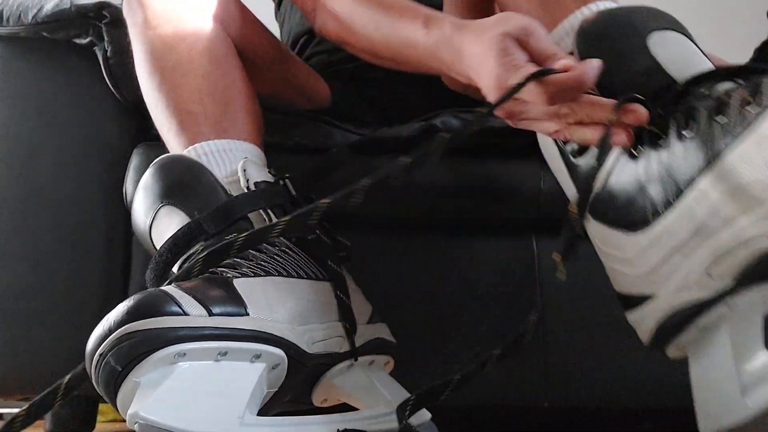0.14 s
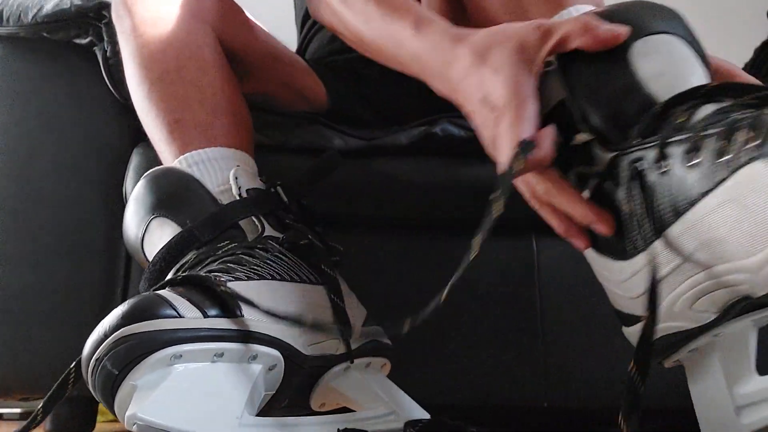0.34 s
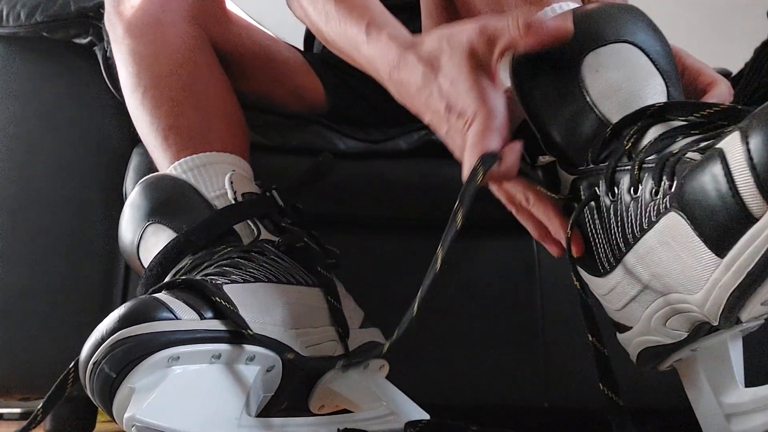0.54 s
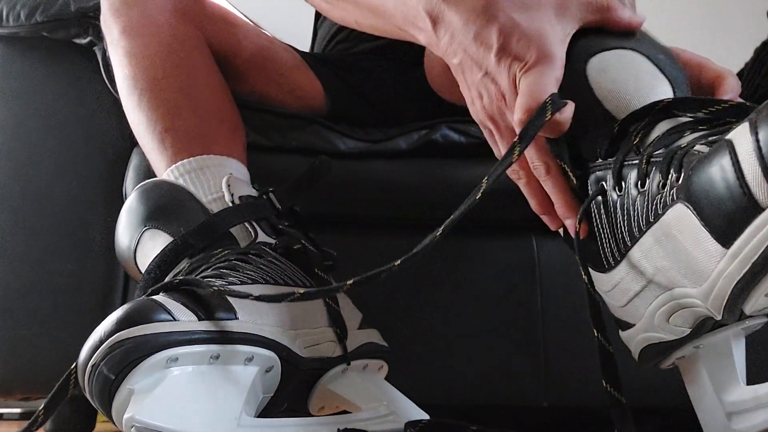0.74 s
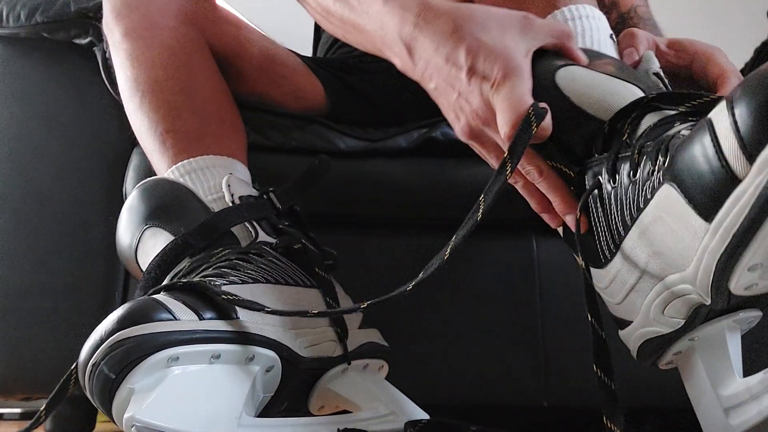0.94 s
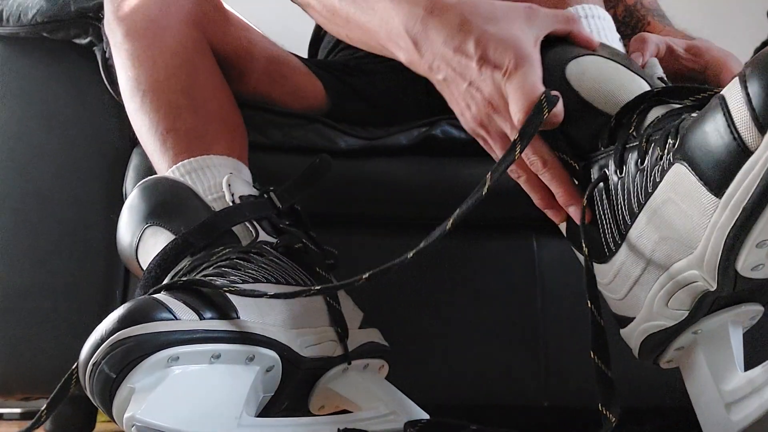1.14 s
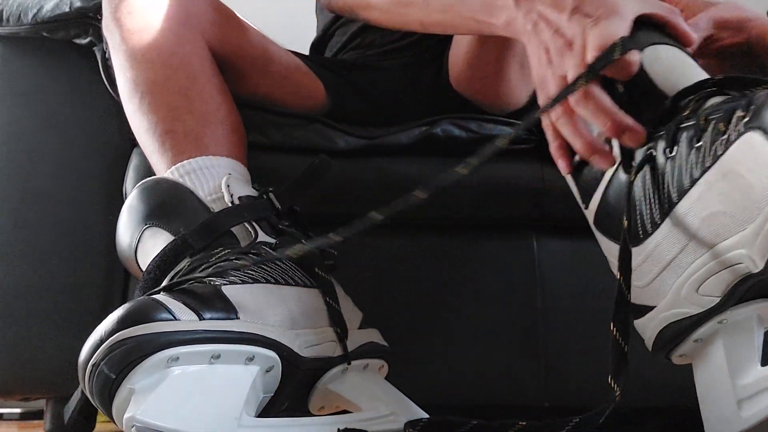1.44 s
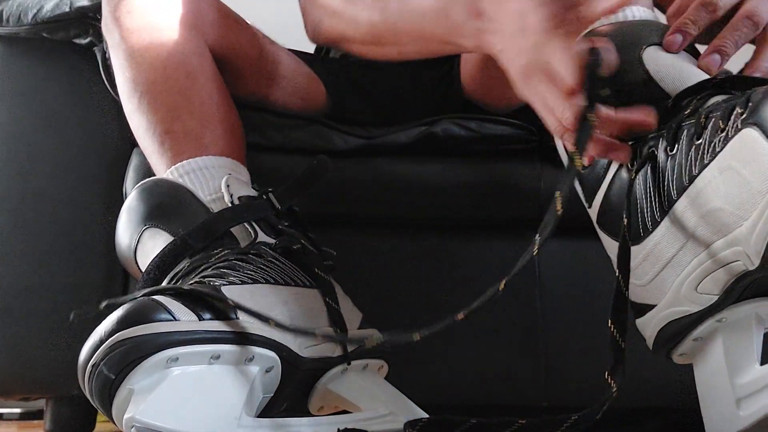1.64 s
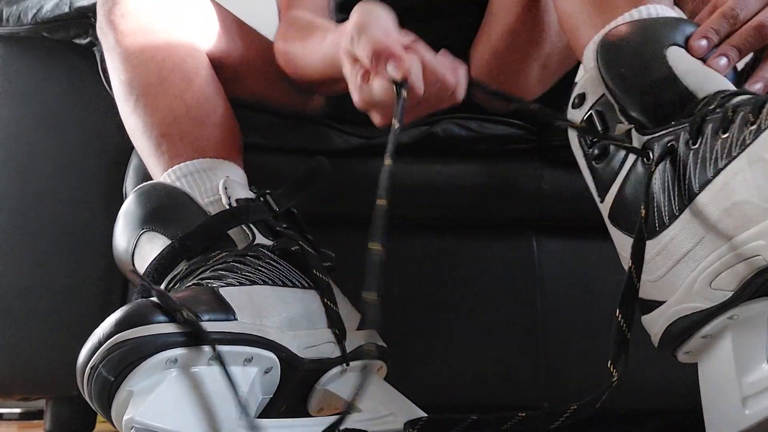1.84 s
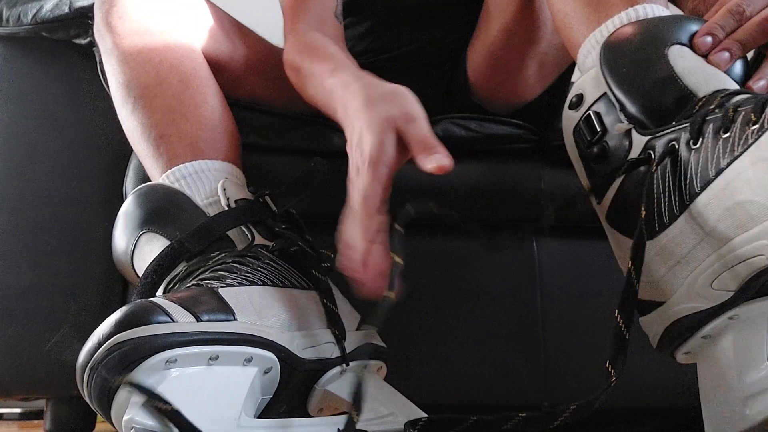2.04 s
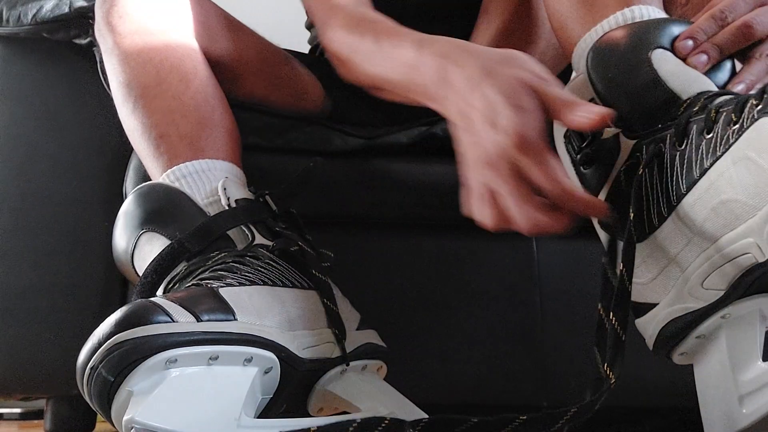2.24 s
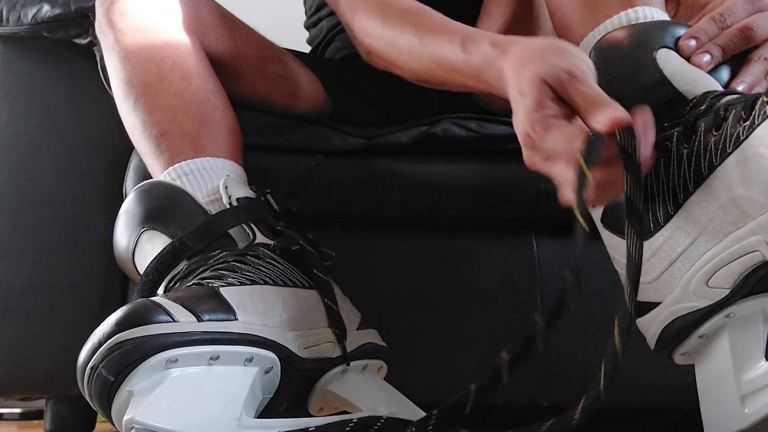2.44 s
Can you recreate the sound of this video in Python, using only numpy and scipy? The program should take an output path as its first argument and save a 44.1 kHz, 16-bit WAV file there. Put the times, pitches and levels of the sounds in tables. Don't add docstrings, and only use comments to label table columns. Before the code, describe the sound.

Close up in a quiet small room, hands lace a skate boot; it thuds and rattles early, lace zips briefly, snaps hard over eyelets around the middle, then slides, zips longer and ends with taps.

```python
import sys
import numpy as np
from scipy import signal
from scipy.fft import rfft, irfft
from scipy.io import wavfile

SR = 44100
rng = np.random.default_rng(int(sys.argv[2]) if len(sys.argv) > 2 else 0)


def generate_wav(sig):
    pcm = np.round(np.clip(np.atleast_2d(sig).T, -1, 1) * 32767).astype(np.int16)
    wavfile.write(sys.argv[1], SR, pcm)


def gain_from_db(level_db):
    decades = np.asarray(level_db, float) / 20
    return 10 ** decades


N = 114660

# frequency [Hz], density [dB per Hz].
ROOM_TONE = [(30, 5), (120, 1), (450, -10), (1000, -14.5), (2000, -29), (8000, -34), (16000, -33)]
# frequency [Hz], left over right [dB].
PORT_COLOUR = [(60, 0.5), (130, 1), (300, 0.3), (1300, -0.5), (2500, 9.5), (5500, 14), (9000, -5),
               (13000, 3)]
# frequency [Hz], left-right likeness [0-1].
PORT_LIKENESS = [(100, 0.58), (500, 0.25), (1500, 0.1), (4000, 0.032), (12000, 0.052)]
# start [s], rise [s], hold [s], level [dB].
SQUEAKS = [
    (2.08, 0.06, 0.1, -77),
]
SQUEAK_BANDS = (1350, 3200)
# frequency [Hz], level [dB], 60 dB decay time [s].
FLOOR_MODES = [(132.7, -10.5, 0.2), (115, -5.5, 0.026), (120, -14, 0.093), (187, -11.5, 0.053)]
# time [s], level [dB].
ROCKS = [
    (.192, -48.5),
    (0.346, -46),
    (0.37, -43),
    (0.397, -44.5),
    (0.422, -57),
    (0.594, -45),
    (0.741, -56),
    (.928, -44),
    (1.602, -47),
    (1.889, -44.5),
]
# time [s], level [dB].
BLADE_TOUCHES = [
    (0.184, -70.5),
    (.196, -71),
    (0.251, -68),
    (.264, -56),
    (0.281, -60.5),
    (0.301, -73),
    (0.317, -78),
    (0.332, -72),
]
# frequency [Hz], level [dB], 60 dB decay time [s].
BLADE_MODES = [(5410, -4, 0.06), (5550, -5, 0.03), (5680, -6, .025), (5850, -10, .02), (11700, -8, .03),
               (13700, -6, .015)]
# frequency [Hz], level [dB], 60 dB decay time [s].
SHELL_MODES = [(217.7, -0.5, 0.039), (293.2, -17, 0.16), (398, -3.5, 0.024), (459, -1.5, 0.029),
               (655, -5, 0.023), (815, -8.5, 0.021), (1154, -17, 0.0062), (1440, -19, 0.0045)]
# start [s], rise [s], hold [s], level [dB], fine sheen against it [dB].
SLIDES = [(-.05, 0.0052, 0.043, -58.5, -8), (.09, 0.0019, 0.055, -75, 4), (0.242, 0.011, 0.075, -68, 2),
          (0.539, 0.0019, 0.069, -68.5, 0), (0.604, 0.037, 0.062, -71.5, 6),
          (0.773, 0.013, 0.12, -67.5, -5.5), (0.913, 0.0034, 0.036, -61.5, -2.5),
          (0.958, 0.01, 0.069, -64, -6), (1.242, 0.016, 0.25, -73.5, -1.5), (1.512, 0.027, 0.07, -67, -6.5),
          (1.622, 0.011, 0.11, -74, -3.5), (1.727, 0.086, 0.072, -58.5, 0),
          (1.945, .01, 0.035, -74.5, -15.5), (2.01, 0.018, 0.015, -77, 5), (2.34, 0.023, 0.094, -70.5, 0.5),
          (2.463, 0.12, .05, -73.5, 10)]
# frequency [Hz], density [dB per Hz].
RUB_COLOUR = [(900, 11.5), (2200, 0.5), (3200, -9), (4500, -6), (6000, -5), (8000, -8.5), (16000, -77)]
# frequency [Hz], density [dB per Hz].
SHEEN_COLOUR = [(5000, -36.5), (8000, -8), (9500, -1), (11500, 6), (14000, 4), (16000, 4.5)]
# start [s], rise [s], hold [s], level [dB].
GRIPS = [(-.05, 0.0085, 0.027, -38), (.05, .02, 0.045, -59.5), (.13, 0.04, 0.1, -56),
         (.245, 0.014, 0.092, -47), (.39, 0.0022, 0.13, -57), (.533, 0.0033, 0.055, -48.5),
         (.64, 0.016, 0.097, -47.5), (.76, 0.006, 0.15, -46), (.85, 0.054, 0.048, -34.5),
         (1.0, 0.015, 0.033, -42.5), (1.17, 0.058, .06, -56), (1.24, 0.055, 0.1, -48),
         (1.47, 0.0075, 0.077, -48), (1.635, 0.027, 0.041, -53), (1.78, 0.055, 0.062, -40),
         (1.955, 0.0016, 0.016, -49), (2.03, 0.0039, 0.03, -61.5), (2.24, 0.012, 0.023, -65.5),
         (2.35, 0.023, 0.026, -59.5), (2.5, 0.022, 0.086, -54.5)]
# time [s], peak [dB], pitch [Hz], bright edge against the peak [dB].
SHELL_TAPS = [(0.189, -44.5, 375, -18), (0.247, -30.5, 183, -20), (0.281, -42, 213, -10.5),
              (0.328, -38, 303, -8), (0.396, -43.5, 220, -12), (0.532, -41.5, 502, -23),
              (0.584, -35.5, 233, -22), (0.709, -36.5, 225, -17.5), (0.917, -31.5, 484, -11.5),
              (0.928, -33, 175, -16), (0.955, -30.5, 300, -12.5), (1.058, -32, 447, -16),
              (1.072, -32, 467, -10.5), (1.375, -41.5, 223, -19), (1.526, -45, 270, -7),
              (1.545, -38, 215, -35), (1.64, -40, 245, -51), (1.654, -41.5, 240, -35),
              (1.671, -47.5, 315, -31), (1.71, -38.5, 380, -50), (1.96, -30.5, 246, -24.5),
              (2.039, -46.5, 410, -45), (2.251, -46, 352, -12), (2.383, -50, 450, -4),
              (2.4257, -38, 593, -16), (2.439, -46.5, 446, -30)]
# time [s], peak [dB], pitch [Hz].
TIP_TICKS = [(0.0943, -45.5, 13800), (0.2834, -55, 5540), (0.5485, -53, 14500), (0.586, -48, 14200),
             (0.917, -53, 5600), (1.3773, -58.5, 5060), (1.544, -45, 6300), (2.3348, -63, 4430),
             (2.3365, -58, 2380), (0.708, -57, 4970), (2.4269, -44, 12700), (2.438, -51, 4600)]
# time of the peak [s], peak [dB], pitch [Hz].
RIM_SNAPS = [(.002, -65, 500), (.058, -53.5, 1330), (.26, -47, 700), (0.2662, -50, 1470),
             (0.2846, -47, 1790), (.334, -47.5, 1190), (0.3483, -51.5, 890), (.3968, -43, 680),
             (.5423, -46.5, 780), (.5878, -47, 605), (.829, -52, 910), (.868, -37.5, 627),
             (.8774, -35, 520), (.8863, -43, 650), (.8964, -40, 780), (.9036, -27, 480), (.9183, -34, 850),
             (.9275, -36, 1300), (.9424, -35, 650), (.9576, -34, 600), (.9661, -37, 600), (.9722, -40, 780),
             (.9952, -45, 620), (1.0065, -46, 920), (1.0176, -44, 1350), (1.0483, -40, 700),
             (1.0591, -50, 1340), (1.0754, -47, 890), (1.2056, -59, 880), (1.2287, -55, 870),
             (1.25, -54, 880), (1.2772, -48, 750), (1.3063, -55, 750), (1.3215, -52, 900),
             (1.3879, -48, 650), (1.4137, -52, 650), (1.4782, -51, 700), (1.5292, -45, 780),
             (1.5479, -35, 480), (1.6557, -37, 520), (1.6733, -44.5, 600), (1.9603, -49, 1090),
             (1.9672, -51, 770), (1.9763, -49.5, 823.5), (2.0578, -51.5, 425), (2.3516, -54.5, 610),
             (2.3864, -51.5, 750), (2.4013, -63, 980), (2.4312, -44, 970), (2.438, -33, 880),
             (2.5268, -65, 1060), (2.5374, -51.5, 675), (2.588, -51, 620)]
# time [s], weave rate [Hz], level [dB], strong-weak share [0-1].
LACE_PULLS = [(.652, 440, -59.5, 1), (.675, 483.3, -33.5, 0.96), (.7, 432, -50, 1),
              (.725, 448, -55.5, 0.75), (1.77, 485.6, -100, 0), (1.787, 515.7, -43, 0.12),
              (1.835, 686, -36, 0.16), (1.86, 559.5, -38.5, 0.35), (1.875, 472, -35.5, 0.63),
              (1.9, 360, -48, 0.3), (1.93, 257, -63, .2)]

GRIP_T60_S, SLIDE_T60_S, ROOM_T60_S = 0.23, 0.34, 0.24


def rms_one(x):
    return x / np.sqrt(np.mean(x ** 2) + 1e-20)


def highpass(x, order, hz):
    return signal.sosfilt(signal.butter(order, hz, "high", fs=SR, output="sos"), x)


def in_time(rows):
    s, *columns = np.transpose(rows)
    return [np.interp(np.arange(N) / SR, s, column) for column in columns]


def at_hz(points):
    hz = np.maximum(np.fft.rfftfreq(N, 1 / SR), 1)
    table_hz, value = np.transpose(points)
    return np.interp(np.log(hz), np.log(table_hz), value)


def drift(rate_hz):
    r = np.exp(-2 * np.pi * rate_hz * 40 / SR)
    noise = rng.standard_normal(N // 40 + 2002)
    slow = signal.lfilter([1], [1, -2 * r, r * r], noise)[2000:]
    return np.interp(np.arange(N) / 40, np.arange(len(slow)), rms_one(slow))


def ring(clicks, hz, t60):
    r = gain_from_db(-60 / (max(t60, .001) * SR))
    w = 2 * np.pi * hz / SR
    return signal.lfilter([0, np.sin(w)], [1, -2 * r * np.cos(w), r * r], clicks + 1e-18)


def ring_modes(clicks, modes):
    return sum(gain_from_db(db) * ring(clicks, hz, t60) for hz, db, t60 in modes)


def click(s, db):
    out = np.zeros(N)
    out[(np.atleast_1d(s) * SR).astype(int)] = gain_from_db(db)
    return out


def grains(rate_per_s, scatter_db):
    sizes = gain_from_db(scatter_db * np.minimum(rng.exponential(1, N), 4)) * rng.choice([-1, 1], N)
    return sizes * (rng.random(N) < rate_per_s / SR)


def strokes(rows, t60):
    t = np.arange(N) / SR
    power = np.zeros(N)
    for s, rise, hold, db in rows:
        released_s = np.maximum(t - s - rise - hold, 0)
        swell = np.clip((t - s) / max(rise, .001), 0, 1) ** 2
        power += (gain_from_db(db - 60 * released_s / t60) * swell) ** 2
    return np.sqrt(power)


def stereo(pair, spectrum):
    mid, side = rfft(pair) * gain_from_db(at_hz(spectrum))
    alike = np.clip(at_hz(PORT_LIKENESS), 0, 1)
    return rms_one(irfft(np.sqrt(1 + alike) * mid + np.sqrt(1 - alike) * side * [[1], [-1]], N))


def room_tone():
    return gain_from_db(-64.5) * stereo(rng.standard_normal((2, N)), ROOM_TONE)


def echoes(x):
    x = highpass(x, 2, 170)
    out = np.zeros((2, N))
    dull = np.exp(-2 * np.pi * 3600 / SR)
    lags = (rng.uniform(.006, .03, 12) * SR).astype(int)
    for k, lag in enumerate(lags):
        loop, state = x.copy(), [0.]
        gain = gain_from_db(-60 * lag / SR / ROOM_T60_S)
        for i in range(lag, N, lag):
            back, state = signal.lfilter([gain * (1 - dull)], [1, -dull], loop[i - lag:i], zi=state)
            loop[i:i + lag] += back[:N - i]
        out[k % 2] += (loop - x) * (-1) ** (k // 2)
    return gain_from_db(-15.5) * out


def squeak():
    air = np.zeros(N)
    for hz in SQUEAK_BANDS:
        air += rms_one(ring(rng.standard_normal(N), hz, 0.05)) * SQUEAK_BANDS[0] / hz
    return strokes(SQUEAKS, GRIP_T60_S) * air


def thud():
    contact = np.hanning(int(0.0061 * SR))
    edge = np.diff(contact / contact.sum(), prepend=0) * 60.0
    hits = click(.2462, -7) + gain_from_db(9.5) * click(*np.transpose(ROCKS))
    return ring_modes(np.convolve(hits, edge)[:N], FLOOR_MODES)


def blade():
    s, db = np.transpose(BLADE_TOUCHES)
    out = np.zeros(N)
    for hz, level_db, t60 in BLADE_MODES:
        uneven_db = 3.4 * rng.standard_normal(len(s))
        out += ring(click(s, db + level_db + uneven_db), hz, t60)
    return out


def sliding():
    fibres_per_s = 10000
    flicker_db = -0.5 * drift(41)
    rub = stereo([grains(fibres_per_s, 4.34) for _ in range(2)], RUB_COLOUR)
    rub = rub * gain_from_db(6 + flicker_db)
    sheen = stereo([grains(fibres_per_s, 4.7) for _ in range(2)], SHEEN_COLOUR)
    sheen = sheen * gain_from_db(flicker_db + 0.8 * drift(35))
    rub_rows = [row[:4] for row in SLIDES]
    sheen_rows = [(s, rise, hold, db + sheen_db) for s, rise, hold, db, sheen_db in SLIDES]
    return rub * strokes(rub_rows, SLIDE_T60_S) + sheen * strokes(sheen_rows, SLIDE_T60_S)


def creak():
    slips = grains(2500 * gain_from_db(1.5 * drift(30)), 3.5)
    slips = rms_one(slips) * strokes(GRIPS, GRIP_T60_S)
    out = np.zeros(N)
    for hz, db, t60 in SHELL_MODES:
        out += gain_from_db(db) * ring(slips * rng.standard_normal(N), hz, t60)
    hz, db, t60 = FLOOR_MODES[0]
    out += gain_from_db(db - 2.5) * ring(slips * rng.standard_normal(N), hz, t60)
    return out / 18.7


def taps():
    out, t = np.zeros(N + 2000), np.arange(2000) / SR
    edge = signal.butter(3, [888 * 0.85, 888 * 1.57], "band", fs=SR, output="sos")
    for s, db, hz, edge_db in SHELL_TAPS:
        rasp = rng.standard_normal(2000) ** 3 * np.exp(-t / 0.0067)
        cycles = hz * t + .5 * (1 - np.exp(-t * hz * 2))
        swell = np.minimum(t * hz * 1.84, 1)
        sound = -gain_from_db(3.5 - 60 * t * hz / 9.3) * np.sin(2 * np.pi * cycles) * swell
        sound += gain_from_db(-14.5 + edge_db) * rms_one(signal.sosfilt(edge, rasp))
        sound += gain_from_db(-22) * rms_one(ring_modes(rasp, SHELL_MODES))
        i = int((s + 0.001978) * SR)
        out[i:i + 2000] += gain_from_db(db) * sound * np.cos(np.pi * t / t[-1] / 2)
    return out[:N]


def ticks():
    out, t = np.zeros((2, N)), np.arange(1200) / SR
    for s, db, hz in TIP_TICKS:
        band = signal.butter(1, [hz * 0.93, min(hz * 1.17, 18000)], "band", fs=SR, output="sos")
        puff = rms_one(signal.sosfilt(band, rng.standard_normal((2, 1200))))
        i = int(s * SR)
        out[:, i:i + 1200] += puff * gain_from_db(db - 6 - 60 * t / 0.017)
    return out


def snaps():
    out, t = np.zeros(N + 1000), np.arange(1000) / SR
    for s, db, hz in RIM_SNAPS:
        cycles = hz * t + .6 * (1 - np.exp(-1.5 * hz * t))
        ping = gain_from_db(7 - 60 * t * hz / 5) * np.sin(2 * np.pi * cycles) * np.minimum(t * hz * 2, 1)
        rim = gain_from_db(-25.5 - 60 * t / 0.024) * np.sin(2 * np.pi * 2253 * t) * np.minimum(t * hz, 1)
        i = max(int((s - .6 / hz) * SR), 0)
        out[i:i + 1000] += gain_from_db(db) * (ping + rim)
    return signal.sosfilt(signal.butter(4, 2800, fs=SR, output="sos"), out[:N])


def zip_pull():
    rate_hz, level_db, uneven = in_time(LACE_PULLS)
    phase = 2 * np.pi * np.cumsum(rate_hz * (1 + .09 * drift(117.5))) / SR
    bumps = np.sin(phase) + 0.016 * np.sin(2 * phase)
    bumps += np.sin(phase / 2) * (uneven + .2 * drift(80))
    t = np.arange(N) / SR
    running = (t > LACE_PULLS[0][0]) * (t < LACE_PULLS[-1][0])
    return rms_one(bumps * gain_from_db(3.2 * drift(200))) * gain_from_db(level_db) * running


def scene():
    shell = highpass(creak() + taps() + snaps(), 2, 143)
    boot = thud() + blade() + shell + zip_pull()
    return room_tone() + echoes(boot) + squeak() + boot + sliding() + ticks()


def roll_off(x):
    return signal.sosfilt(signal.butter(12, 15850, fs=SR, output="sos"), x)


def record(dry):
    dry = highpass(dry, 3, 69.7)
    tilt = gain_from_db(at_hz(PORT_COLOUR) * [[.5], [-.5]])
    lag = np.exp(-2j * np.pi * np.fft.rfftfreq(N, 1 / SR) * [[.00007], [0]])
    return roll_off(irfft(rfft(dry) * tilt * lag, N))


dry = scene()
out = record(dry)
generate_wav(out)
```